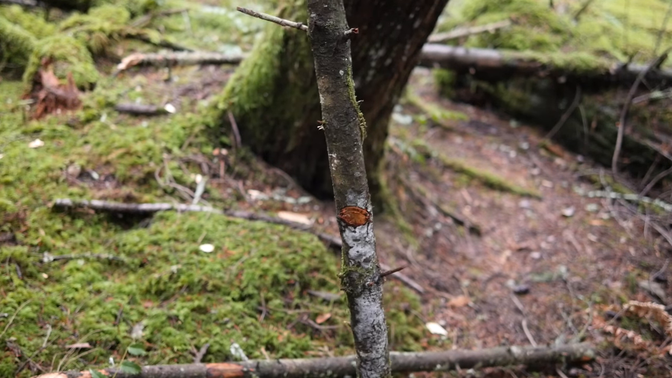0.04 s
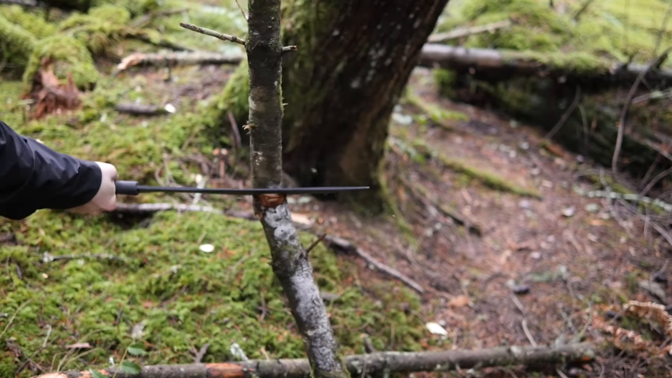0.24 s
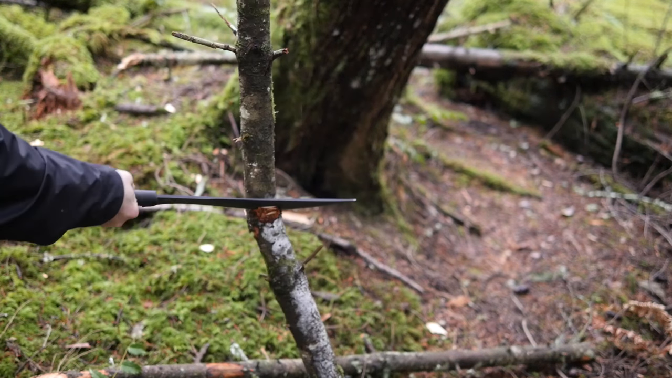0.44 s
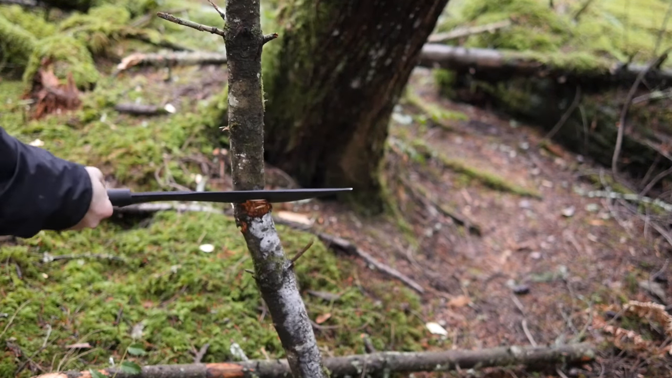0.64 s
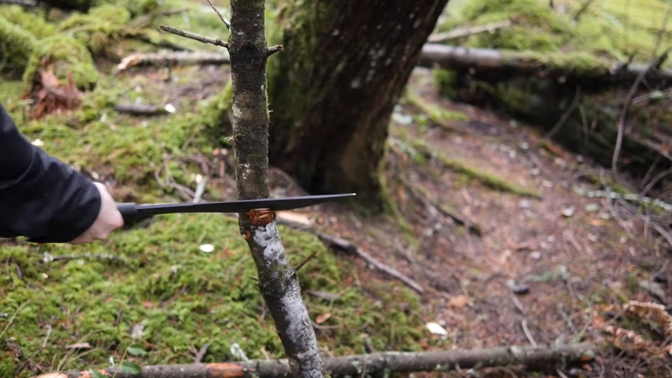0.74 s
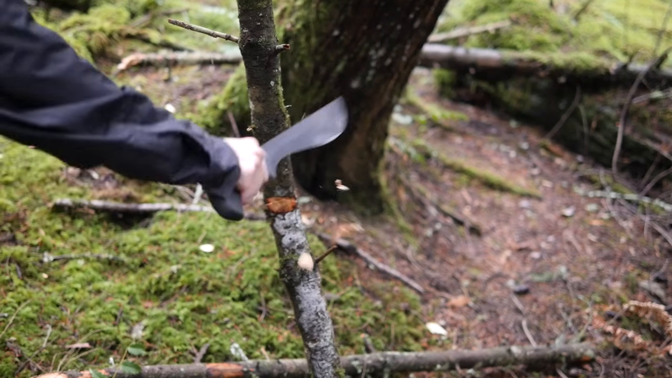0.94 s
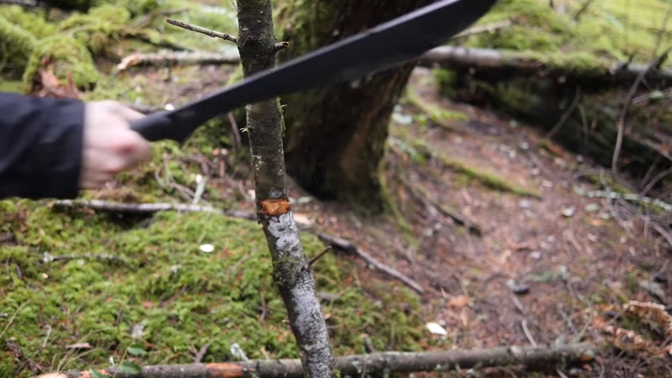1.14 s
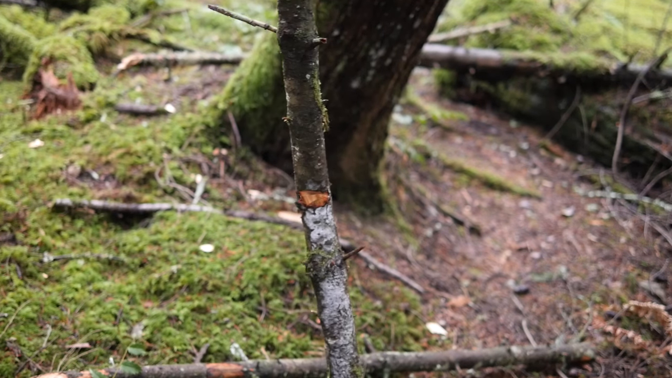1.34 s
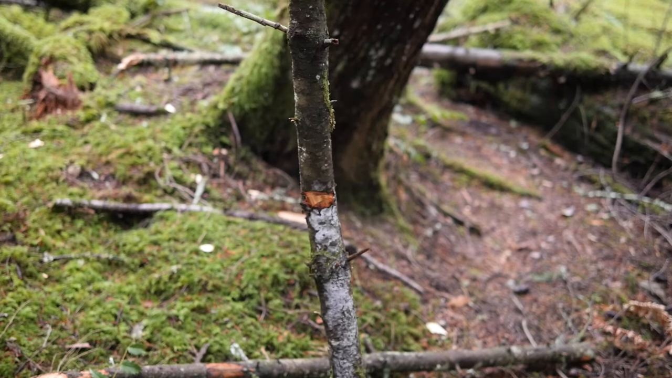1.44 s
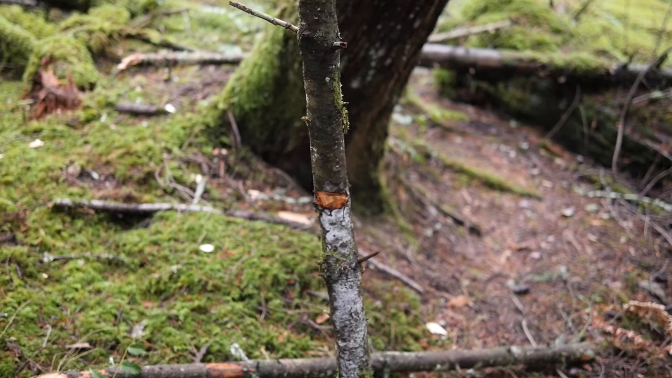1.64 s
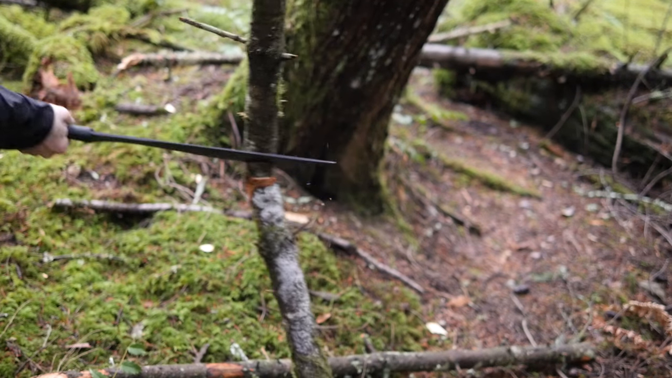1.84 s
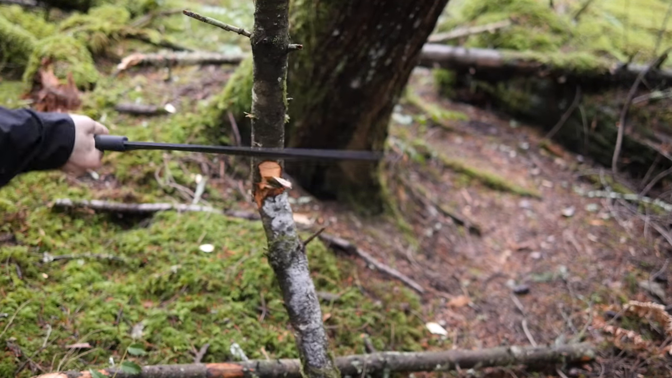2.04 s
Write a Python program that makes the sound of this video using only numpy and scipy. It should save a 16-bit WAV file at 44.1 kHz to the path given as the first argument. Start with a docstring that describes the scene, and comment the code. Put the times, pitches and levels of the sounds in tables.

```python
"""A steel blade chops twice into a thin green sapling, close by in a damp, quiet wood.
Each blow is a burst of tearing fibres over the knock of the stem, loud enough to overload the camera.
Splinters snap, bits fall, the blow echoes away, and the blade scrapes free of the cut.
On the left the swing whooshes and the chopper's jacket rustles and pops, over the low forest hush."""
import sys
import numpy as np
from scipy.fft import rfft, irfft, next_fast_len
from scipy.io import wavfile

SR = 44100
rng = np.random.default_rng(int(sys.argv[2]) if len(sys.argv) > 2 else 0)


def master(y):
    """Save y as 16-bit WAV."""
    cut = np.clip(np.atleast_2d(y).T, -1, 1)
    pcm = np.round(cut * 32767)  # scale
    wavfile.write(sys.argv[1], SR, pcm.astype(np.int16))


N = 92610  # 2.1 seconds

# Tone of the low forest hush and of the high hiss: f/Hz, level/dB
HUSH_TONE = [(25, -19), (60, -12), (240, -6), (530, -11), (900, -19.5), (1900, -23), (6000, -57)]
HISS_TONE = [(1500, -36.5), (2500, -8), (6500, -9.5), (10300, -2.5), (14900, -16), (15700, -44.5)]
# How the hiss swells and sinks: t/s, level/dB
HISS_LEVELS = [(0, -60.5), (.13, -50.5), (.3, -51), (.7, -66.5), (.9, -55.5), (1.1, -68.5), (1.28, -57),
               (1.6, -61), (1.85, -45.5), (2, -65), (2.1, -53.5)]
# How alike left and right sound: f/Hz, likeness (1 = the same)
STEREO_LIKENESS = [(180, 0.99), (550, 0.93), (1650, 0.2)]

# How loudly the jacket rustles and the swung blade whooshes: t/s, level/dB
RUSTLE_WHOOSH_LEVELS = [(0, -57.5), (.1, -50), (.174, -45.5), (.188, -36.5), (.23, -38.5), (.35, -52),
                        (.6, -59.5), (1.15, -61), (1.26, -55), (1.42, -59.5), (1.68, -53.5), (1.82, -42),
                        (1.95, -50), (2.1, -54.5)]
# Tone of the rustle and whoosh, and of a crease's tick: f/Hz, level/dB
RUSTLE_WHOOSH_TONE = [(60, -39), (150, -9), (700, -5), (2750, -17), (7800, -28), (16000, -48.5)]
TICK_TONE = [(300, -7.5), (1100, -2), (4000, -18), (12000, -32.5)]
# Creases folding: t/s, pop level/dB, pop f/Hz, tick level/dB
CREASE_FOLDS = [(0.1242, -53, 1260, -36.5), (0.152, -33, 600, -38.5), (1.0282, -47, 1600, -43),
                (1.207, -36.5, 638, -58), (1.3166, -40, 825, -38), (1.5127, -54, 1110, -43),
                (1.5251, -33.5, 400, -33.5), (1.5652, -36.5, 383, -45), (1.6208, -40.5, 675, -60),
                (1.6404, -31, 420, -38.5), (1.663, -46, 800, -61), (1.6776, -40.5, 430, -44),
                (1.7333, -32, 450, -40), (1.7446, -46, 1050, -54), (1.7598, -20.5, 940, -58),
                (1.7702, -24, 340, -26)]
# Where the jacket and the cut are heard: f/Hz, left-over-right level/dB
JACKET_POSITION = [(420, 0), (1300, 13), (4400, 12), (13000, 3)]
CUT_POSITION = [(600, -.3), (1200, 1.3)]

# The blows: t/s, tear level/dB, tear rise/s, bits and echo level/dB, blade ring level/dB
BLOWS = [(0.2207, -6.5, 0.00012, -28, -37), (1.8414, -11, 0.00061, -31, -46)]
# Tone of each blow's tearing burst, and of the tail of scattering bits and forest echo: f/Hz, level/dB. # The
# blows are heard with a narrow dip near 5.2 kHz.
TEAR_TONE = [(300, -32.5), (1800, -15), (4600, -10), (5200, -16), (5900, -9), (10000, -5), (13000, -13.5),
             (16500, -26.5)]
TAIL_TONE = [(250, -35.5), (900, -4.5), (1800, -5), (5000, -13.5), (10000, -6), (16000, -26)]
# The stem's own notes, struck at a different spot each time. T60 is the time to fade by 60 dB.
# f/Hz, T60/s, first blow level/dB, second blow level/dB
STEM_NOTES = [(202, 0.032, -12.5, -16), (360, 0.036, -12, -27.5), (478, 0.039, -14, -25.5),
              (706, 0.035, -7.5, -13), (1024, 0.054, -19, -15.5), (1221, 0.021, -18, -2.5),
              (1432, 0.02, -7, -6.5), (1954, 0.011, -24.5, -2), (2175, 0.016, -12, -6.5),
              (2924, 0.015, -31, -9), (3705, 0.011, -25.5, -10.5)]
# Pitches at which the steel rings: f/Hz, half-width/Hz
BLADE_RINGS = [(4450, 400), (7100, 450)]
# Splinters and bark snapping at the cut: t/s, ping level/dB, ping f/Hz, crackle level/dB
SPLINTER_SNAPS = [(0.2484, -46, 1760, -4), (0.2553, -38, 2110, -26), (0.263, -32, 2770, -15),
                  (0.282, -14.5, 1900, -31), (0.2878, -30, 1860, -19.5), (0.2984, -17, 1930, -30),
                  (0.3336, -38, 4250, -24), (0.59, -54, 4530, -27), (0.8249, -48, 2070, -37.5),
                  (0.882, -47, 3000, -38), (0.9164, -20, 2937, -22), (1.8688, -10, 1940, -21),
                  (1.8846, -28, 1850, -32), (1.9098, -21, 1720, -33), (1.9161, -20, 2100, -32),
                  (1.9238, -13, 2030, -20.5)]
# The blade grinding in the cut and bits rustling down: middle t/s, length/s, level/dB
SCRAPE_STROKES = [(0.598, 0.018, -52), (.853, 0.011, -45), (0.927, 0.017, -42), (1.373, 0.01, -47.5)]
# Tone of the crackle in both snaps and scrapes: f/Hz, level/dB
CRACKLE_TONE = [(900, -12), (2500, -4), (6000, -8), (10000, -3), (16000, -17.5)]


def amp(db):
    """Turn decibels into a factor to multiply a sound by."""
    return 10 ** (np.asarray(db) / 20)


def unit(x):
    """Scale a sound to an average strength (rms) of 1."""
    return x / np.sqrt(np.mean(x ** 2) + 1e-20)


def along(points, hz):
    """Read a table of (f/Hz, value) between its rows, on a log scale of frequency."""
    freqs, values = np.transpose(points)
    return np.interp(np.log(hz + 1), np.log(freqs + 1), values)


def curve(rows):
    """Read a table of (t/s, value) at every sample."""
    return np.interp(np.arange(N) / SR, *np.transpose(rows))


def filtered(x, response):
    """Turn each frequency of x up or down by the factor response(hz)."""
    size = next_fast_len(x.shape[-1] + SR // 4)
    gains = response(np.fft.rfftfreq(size, 1 / SR))
    return irfft(rfft(x, size) * gains, size)[..., :x.shape[-1]]


def noise(tone, size):
    """Smooth noise with the given tone."""
    return unit(filtered(rng.standard_normal(size), lambda hz: amp(along(tone, hz))))


def grainy(tone, size, per_s, spread_db):
    """Noise broken into short grains, some louder and some softer."""
    grain_db = spread_db * np.clip(rng.standard_normal(size // 8 + 4), -2, 2)
    grain_index = np.arange(size) * min(per_s / SR, 1 / 8)
    gain = amp(np.interp(grain_index, np.arange(len(grain_db)), grain_db))
    return unit(filtered(gain * rng.standard_normal(size), lambda hz: amp(along(tone, hz))))


def wide_noise(tone):
    """Noise from all around: both ears share the mid part and get the side part with opposite signs."""
    def shares(hz):
        angle = np.arccos(np.clip(along(STEREO_LIKENESS, hz), -1, 1)) / 2
        return amp(along(tone, hz)) * [np.cos(angle), np.sin(angle)]
    mid, side = filtered(rng.standard_normal((2, N)), shares)
    return unit(np.array([mid + side, mid - side]))


def panned(x, position):
    """Place a sound by making one ear louder, by an amount that depends on frequency."""
    return filtered(x, lambda hz: amp(along(position, hz) * np.array([[.5], [-.5]])))


def add(track, start, x):
    """Mix x into the track, beginning at start seconds."""
    part = track[round(start * SR):][:len(x)]
    part += x[:len(part)]


def forest(hush_db=-53.5):
    """The forest gives a low hush, and a high hiss swells with the movement."""
    return amp(hush_db) * wide_noise(HUSH_TONE) + amp(curve(HISS_LEVELS)) * wide_noise(HISS_TONE)


def jacket_and_swing(pitch_sag=.9, pop_fade_db_per_cycle=10, tick_t60_s=.014):
    """Stiff cloth rustles, the swung blade whooshes, and creases pop and tick as they fold."""
    out = amp(curve(RUSTLE_WHOOSH_LEVELS)) * grainy(RUSTLE_WHOOSH_TONE, N, per_s=350, spread_db=3)
    t = np.arange(SR // 20) / SR
    for start, pop_db, hz, tick_db in CREASE_FOLDS:
        cycles = hz * t + pitch_sag * (1 - np.exp(-hz * t))  # the pitch starts high and quickly drops
        loudness = 2 * amp(pop_db - pop_fade_db_per_cycle * hz * t) * (1 - np.exp(-2 * hz * t))
        pop = loudness * np.sin(2 * np.pi * cycles)
        tick = amp(tick_db - 60 * t / tick_t60_s) * noise(TICK_TONE, len(t))
        add(out, start, pop + tick)
    return out


def fibre_tear(t, db, hold_s=.0022, t60_s=.006, fizz_db=-11, fizz_t60_s=.066):
    """Fibres split in one short burst, then keep fizzing more softly."""
    burst = amp(-60 * np.maximum(t - hold_s, 0) / t60_s)
    fizz = amp(fizz_db - 60 * t / fizz_t60_s)
    return amp(db) * (burst + fizz) * noise(TEAR_TONE, len(t))


def stem_knock(t, blow):
    """The struck stem shakes at several notes at once, and each dies away fast."""
    knock = np.zeros(len(t))
    for hz, t60_s, *blow_db in STEM_NOTES:
        rise = 1 - np.exp(-2 * hz * t)
        knock += amp(blow_db[blow] - 60 * t / t60_s) * rise * np.sin(2 * np.pi * hz * t)
    return knock


def blade_ring(t, db, t60_s=.6):
    """The steel sings faintly in two narrow bands of pitch."""
    def steel(hz):
        return sum(width ** 2 / (width ** 2 + (hz - centre) ** 2) for centre, width in BLADE_RINGS)
    return amp(db - 60 * t / t60_s) * unit(filtered(rng.standard_normal(len(t)), steel))


def bits_and_echo(t, db, rise_s=.018, t60_s=.38):
    """Bits scatter and the blow echoes away through the forest."""
    loudness = amp(db - 60 * t / t60_s) * (1 - np.exp(-(t / rise_s) ** 2))
    return loudness * grainy(TAIL_TONE, len(t), per_s=1200, spread_db=6)


def chops(tear_side_db=-14, tail_side_db=-1.5):
    """Each blow tears fibres, knocks the stem, rings the blade and leaves a tail of bits and echo."""
    out, t = np.zeros((2, N)), np.arange(SR // 2) / SR
    for blow, (start, tear_db, rise_s, tail_db, ring_db) in enumerate(BLOWS):
        tear, tear_side = fibre_tear(t, tear_db), fibre_tear(t, tear_db)
        tail, tail_side = bits_and_echo(t, tail_db), bits_and_echo(t, tail_db)
        knock = stem_knock(t, blow)
        mid = tear + tail + blade_ring(t, ring_db)
        side = amp(tear_side_db) * tear_side + amp(tail_side_db) * tail_side  # widens the sound
        rise = 1 - np.exp(-(t / rise_s) ** 2)
        add(out[0], start, knock + rise * (mid + side))
        add(out[1], start, knock + rise * (mid - side))
    return out


def splinters(rise_s=.0003, ping_t60_s=.004, crackle_t60_s=.0055):
    """Each splinter snaps with a short woody ping under a bright crackle."""
    out, t = np.zeros(N), np.arange(SR // 20) / SR
    rise = 1 - np.exp(-t / rise_s)
    for start, ping_db, hz, crackle_db in SPLINTER_SNAPS:
        ping = amp(ping_db - 60 * t / ping_t60_s) * np.sin(2 * np.pi * hz * t)
        crackle = amp(crackle_db - 60 * t / crackle_t60_s) * noise(CRACKLE_TONE, len(t))
        add(out, start, rise * (ping + crackle))
    return out


def scrapes():
    """The blade rubs in the cut and bits rustle down: grainy noise that briefly swells and fades."""
    t = np.arange(N) / SR
    swells = sum(amp(db) * np.exp(-2 * ((t - middle) / length) ** 2)
                 for middle, length, db in SCRAPE_STROKES)
    return swells * grainy(CRACKLE_TONE, N, per_s=1200, spread_db=3)


def scene():
    """The cut is near the middle, the jacket and swing on the left and the forest all around."""
    cut = chops() + splinters() + scrapes()
    return panned(cut, CUT_POSITION) + panned(jacket_and_swing(), JACKET_POSITION) + forest()


def record(dry, dip_hz=8110, dip_half_width_hz=300, low_cut_hz=45, ceiling=1.02, hardness=8,
           top_hz=16300):
    """The microphone loses deep bass and dips near 8 kHz; the camera flattens peaks and cuts the top."""
    def microphone(hz):
        dip = 1 - .5 / (1 + ((hz - dip_hz) / dip_half_width_hz) ** 2)
        return dip * hz ** 4 / (hz ** 4 + low_cut_hz ** 4)
    heard = filtered(dry, microphone)
    flattened = heard / (1 + np.abs(heard / ceiling) ** hardness) ** (1 / hardness)
    return filtered(flattened, lambda hz: 1 / (1 + (hz / top_hz) ** 60))


dry = scene()
out = record(dry)
master(out)
```